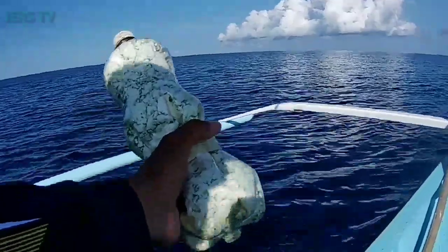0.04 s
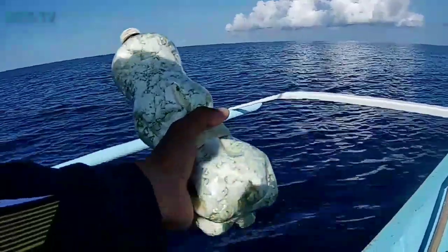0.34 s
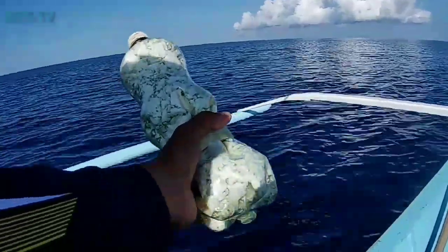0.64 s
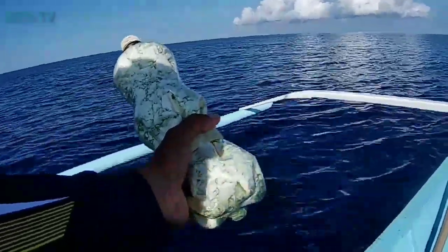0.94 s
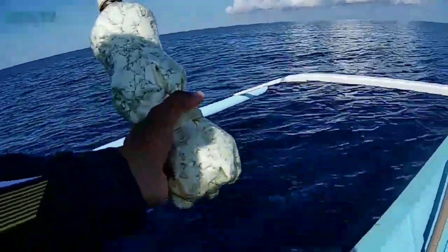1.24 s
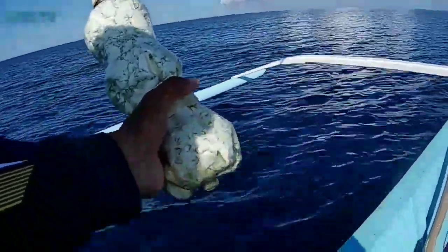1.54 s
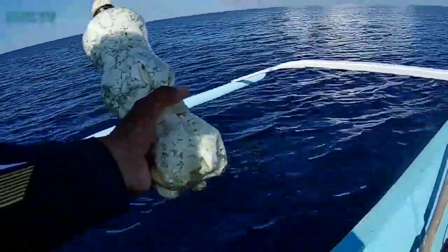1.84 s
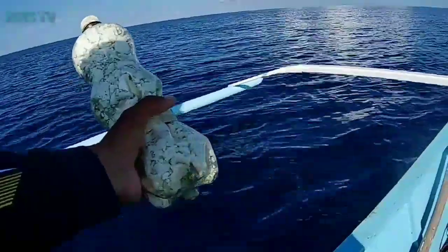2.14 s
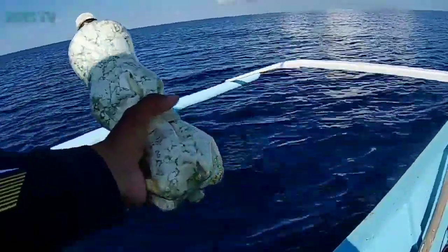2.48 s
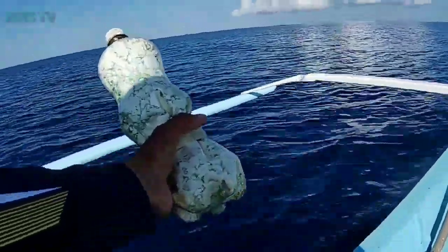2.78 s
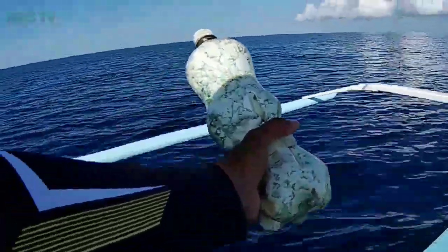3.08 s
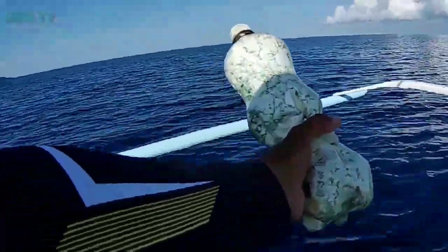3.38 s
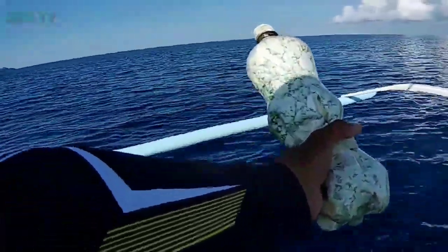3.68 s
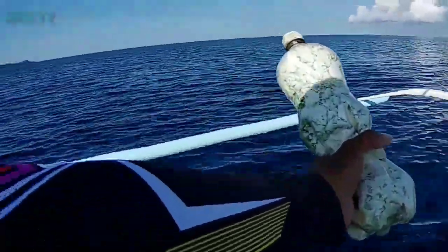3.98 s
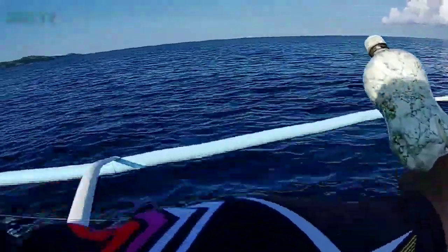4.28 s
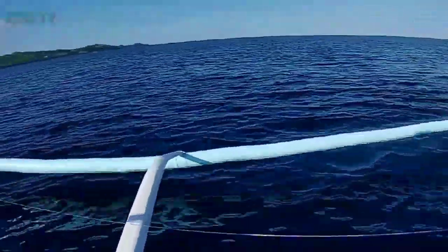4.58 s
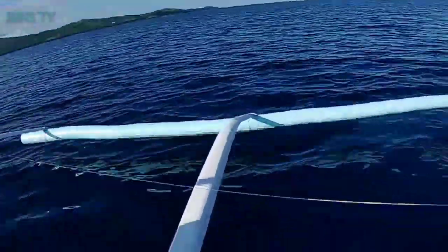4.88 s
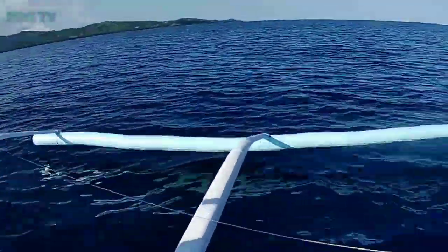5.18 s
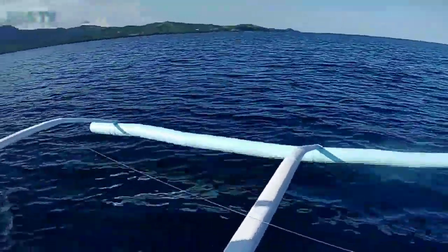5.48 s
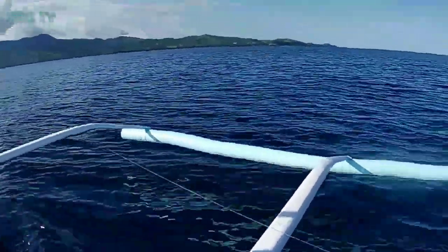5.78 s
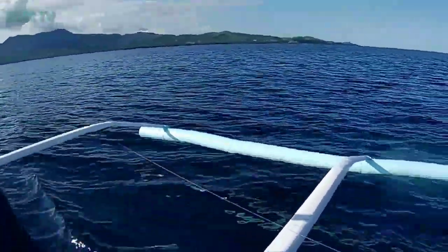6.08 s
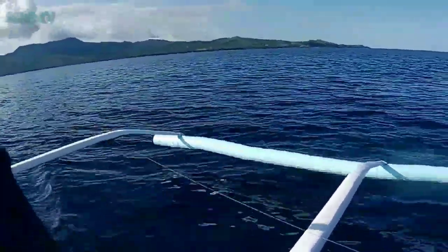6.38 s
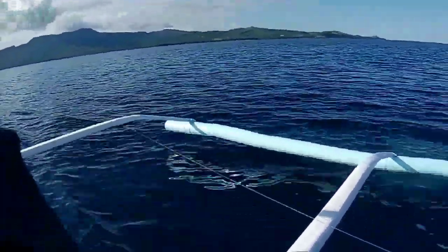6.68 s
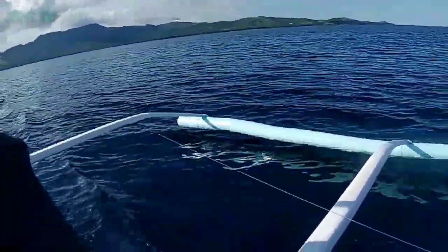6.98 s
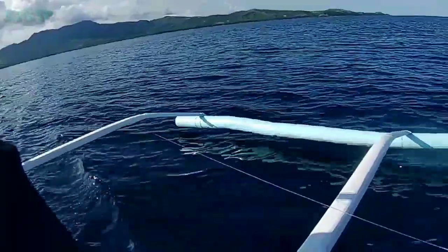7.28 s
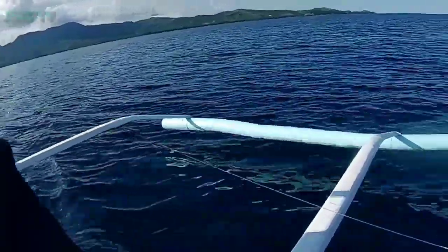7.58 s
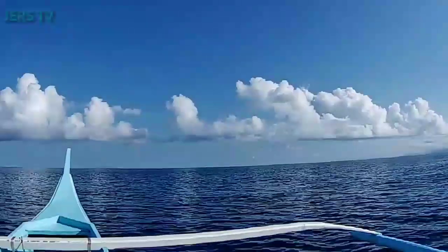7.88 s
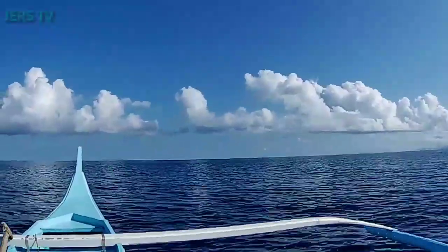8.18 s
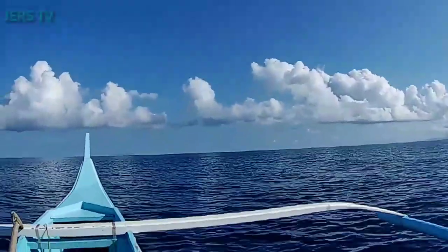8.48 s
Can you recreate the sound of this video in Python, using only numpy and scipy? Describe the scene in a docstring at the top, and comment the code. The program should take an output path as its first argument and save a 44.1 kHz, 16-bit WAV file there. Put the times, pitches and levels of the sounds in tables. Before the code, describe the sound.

Close on board, a single-cylinder boat engine chugs steadily and clatters, then with a click turns abruptly faster, louder and harsher.

```python
"""On board a small outrigger boat on a calm sea, the microphone close to a single-cylinder four-stroke. Each
firing booms out of the exhaust and shakes the hull while the valve gear clatters over a dull churn. The
listener turns to the side, which changes the engine's colour; fishing tackle ticks a few times. Then, with a
click, the scene changes to a faster, louder beat that overloads the microphone."""
import sys
import numpy as np
from scipy import signal
from scipy.fft import rfft, irfft, next_fast_len
from scipy.io import wavfile

SR = 44100
rng = np.random.default_rng(int(sys.argv[2]) if len(sys.argv) > 2 else 0)


def persist_wave(psi):
    """Save psi, clipped to +-1, as 16-bit WAV."""
    counts = np.round(np.clip(psi, -1, 1) * 32767).astype(np.int16)
    wavfile.write(sys.argv[1], SR, np.atleast_2d(counts).T)


N = 381024
LEAD = 11025   # samples: the engine is already running at time zero
TIME = np.arange(-LEAD, N) / SR
JUMP_S = 7.8893   # the fast beat takes over


def from_db(db):
    """Decibels to gain."""
    return 10 ** (np.asarray(db) / 20)


def rms_one(x):
    """Scale to unit rms."""
    return x / np.sqrt(np.mean(x ** 2) + 1e-20)


def in_time(rows):
    """Join (time, value) rows by straight lines."""
    return np.interp(TIME, *np.transpose(rows))


def white():
    """White noise for the whole scene."""
    return rng.standard_normal(len(TIME))


def wander(per_s):
    """Slow chance: random values joined by straight lines, spread about 1."""
    values = rng.standard_normal(256)
    return np.interp((TIME - TIME[0]) * per_s, np.arange(len(values)), values)


def coloured(x, spectrum):
    """Filter a signal by a (Hz, dB) curve; rms 1."""
    size = next_fast_len(len(x))
    hz, db = np.transpose(spectrum)
    bins = np.maximum(np.arange(size // 2 + 1) * SR / size, 1)
    gain = from_db(np.interp(np.log(bins), np.log(hz), db))
    return rms_one(irfft(rfft(x, size) * gain, size)[:len(x)])


def resonance(x, hz, width_hz):
    """Two-pole resonance with gain 1 on top."""
    r = np.exp(-np.pi * width_hz / SR)
    feedback = [1, -2 * r * np.cos(2 * np.pi * hz / SR), r * r]
    return signal.lfilter(np.array([1, 0, -1]) * (1 - r * r) / 2, feedback, x + 1e-18)


def panel(kicks, hz, width_hz):
    """A panel swells and fades after each kick."""
    return resonance(resonance(kicks, hz, width_hz), hz, width_hz)


def cycles(rpm, firing_s):
    """Count of engine cycles, one per two turns, whole at each firing."""
    count = np.cumsum(rpm * np.ones(len(TIME))) / (120 * SR)
    return count - np.interp(firing_s, TIME, count)


def firings(cycle, uneven_db, jitter_s, lag_s=0):
    """One pressure kick per cycle, each a little different in strength and timing."""
    at = np.flatnonzero(np.diff(np.floor(cycle)))
    timing, strength = rng.standard_normal((len(at), 2)).T
    at += np.round((lag_s + jitter_s * timing) * SR).astype(int)
    kicks = np.zeros(len(TIME))
    kicks[np.clip(at, 0, len(TIME) - 1)] = from_db(uneven_db * strength) * SR / 1000
    return kicks


def burst(cycle, share, decay, uneven_db):
    """Envelope of a knock that comes once a cycle and dies away, with a new strength each time."""
    count, since = np.divmod(cycle - share, 1)
    strength = from_db(uneven_db * rng.standard_normal(256))
    return strength[(count - count.min()).astype(int)] * np.exp(-since / decay)


# colour of the churn: (frequency [Hz], relative level [dB])
CHURN_SPECTRUM = [(15, -11), (40, -12.5), (65, -6.5), (100, -1.5), (135, 7.5), (200, -1), (300, -5.5),
                  (430, -10), (530, -13.5), (700, -15.5), (1100, -64.5)]

def churn(level_db):
    """Engine and water churn dully behind everything else."""
    return from_db(level_db) * coloured(white(), CHURN_SPECTRUM)


# ticks of the tackle: (time [s], relative level [dB])
TACKLE_TICKS = [(5.1128, -25), (5.1847, -12), (5.2108, -17.5), (5.254, -26), (5.2854, -21.5),
                (6.528, -24.5)]

def contacts(count, bounce_s=0.01, loss_db=13):
    """Each tick and its uneven bounces, weaker every time: (time [s], level [dB])."""
    gaps = bounce_s * rng.uniform(.8, 1.2, (len(TACKLE_TICKS), count))
    return [(s + gap[:k].sum(), db - k * loss_db)
            for (s, db), gap in zip(TACKLE_TICKS, gaps) for k in range(count)]


# modes of the tackle: (frequency [Hz], width [Hz], relative level [dB])
TACKLE_MODES = [(854, 99, 23.5), (1390, 300, 14), (1970, 320, 15), (3590, 240, 15.5), (4550, 260, -1),
                (5800, 390, -1), (7000, 740, 3.5), (9750, 810, 2), (12000, 2000, -3)]

def tackle(decay_s, gain_db, scrape_db, dull_hz):
    """Each contact, a sharp blow with a brief scrape, rings the fishing tackle on board."""
    age = np.arange(SR // 100) / SR
    touch = np.zeros(len(TIME))
    for s, db in contacts(count=3):
        scrape = rng.standard_normal(len(age)) * np.exp(-age / decay_s)
        blow = (age == 0) + from_db(scrape_db) * scrape / np.linalg.norm(scrape)
        at = np.searchsorted(TIME, s)
        touch[at:at + len(age)] += from_db(db) * blow
    touch = signal.lfilter(*signal.butter(1, dull_hz, fs=SR), touch)   # the tackle is not quite hard
    return sum(from_db(gain_db + db) * resonance(touch, hz, width) for hz, width, db in TACKLE_MODES)


def click(gain_db, dull_hz):
    """One sharp click as the scene changes."""
    spike = np.zeros(len(TIME))
    spike[np.searchsorted(TIME, JUMP_S)] = from_db(gain_db)
    return signal.lfilter([1], [1, -np.exp(-2 * np.pi * dull_hz / SR)], spike)


def facing(turn, ahead_db, side_db):
    """Gain at the microphone as it turns from ahead (0) to the side (1)."""
    return from_db(ahead_db + turn * (side_db - ahead_db))


# modes of the valve: (frequency [Hz], width [Hz], relative level [dB])
VALVE_MODES = [(4170, 86, 4), (5030, 180, 4), (6150, 87, -5), (7700, 500, -8.5), (10080, 440, -12)]

def valve(cycle, turn):
    """The valve taps once a cycle, a short bright tick of uneven strength."""
    taps = white() * burst(cycle, share=0.028, decay=0.077, uneven_db=4.5)
    ring = sum((-1) ** k * from_db(db) * resonance(taps, hz, width)
               for k, (hz, width, db) in enumerate(VALVE_MODES))
    return facing(turn, ahead_db=-68, side_db=-55.5) * rms_one(ring)


# covers, slow: (frequency [Hz], width [Hz], struck at [cycles], level ahead [dB], level to the side [dB])
SLOW_COVER_MODES = [(991, 62, .24, -52.5, -40.5), (1289, 57, .25, -49, -33), (2034, 100, .225, -51, -50.5),
                    (2315, 23, .25, -54.5, -52.5), (3720, 320, 0.17, -68, -64),
                    (4205, 200, 0.16, -62.5, -65.5)]

def slow_covers(cycle, turn, chatter_db=-3.0):
    """Loose metal covers are struck once a cycle, never at quite the same instant, and chatter briefly."""
    sound = 0
    for hz, width, share, ahead, side in SLOW_COVER_MODES:
        strikes = firings(cycle - share, uneven_db=2.0, jitter_s=.0005)
        ping = rms_one(panel(strikes, hz, width))
        buzz = white() * burst(cycle, share, decay=0.098, uneven_db=4.0)
        # heavily damped covers chatter more than they ring
        chatter = from_db(chatter_db) * width / 100 * rms_one(resonance(buzz, hz, width))
        sound += facing(turn, ahead, side) * rms_one(ping + chatter)
    return sound


# covers, fast: (frequency [Hz], width [Hz], level [dB])
FAST_COVER_MODES = [(1201, 26, -37.5), (1860, 60, -42.5), (2030, 59, -46.5), (2270, 41, -43),
                    (3810, 67, -48), (4150, 120, -57)]

def fast_covers(cycle):
    """At high speed the clatter keeps the engine covers ringing."""
    knocks = clatter(cycle, FAST_GEAR_KNOCKS, steady_db=4, uneven_db=3.5)
    return sum(from_db(db) * rms_one(resonance(knocks, hz, width)) for hz, width, db in FAST_COVER_MODES)


def clatter(cycle, knocks, steady_db, uneven_db):
    """Valve and piston knocks are bursts of noise over the steady whirr of the gear."""
    power = sum((from_db(db) * burst(cycle, share, decay, uneven_db)) ** 2 for share, decay, db in knocks)
    return white() * np.sqrt(power + from_db(steady_db) ** 2)


# knocks, slow: (time after the exhaust opens [cycles], decay [cycles], relative level [dB])
SLOW_GEAR_KNOCKS = [(0.065, 0.12, -1.5), (0.269, 0.25, -0.5), (0.679, .07, -10), (.825, 0.12, 0)]
# clatter with the microphone facing ahead, and to the side: (frequency [Hz], relative level [dB])
AHEAD_SPECTRUM = [(440, -32.5), (700, 0.5), (1100, 0), (1470, -7.5), (1800, -23.5), (2050, -12),
                  (2380, -13), (3150, -23.5), (3700, -16.5), (4400, -18), (5700, -31), (8200, -38),
                  (10500, -49), (15500, -62)]
SIDE_SPECTRUM = [(440, -37.5), (750, -8), (950, -4.5), (1290, -3), (1500, -8.5), (2320, -13), (2980, -29.5),
                 (3750, -23), (5000, -24), (5700, -32.5), (7500, -29), (8800, -41.5), (10100, -41),
                 (15500, -66.5)]

def slow_gear(cycle, turn, wander_db=-2.77):
    """The gear's clatter wanders in strength and changes colour as the microphone turns."""
    knocks = clatter(cycle, SLOW_GEAR_KNOCKS, steady_db=-4.5, uneven_db=2.5)
    gain = facing(turn, ahead_db=-38, side_db=-36) * from_db(wander_db * wander(per_s=2.7))
    return gain * ((1 - turn) * coloured(knocks, AHEAD_SPECTRUM) + turn * coloured(knocks, SIDE_SPECTRUM))


# knocks, fast: (time [cycles], decay [cycles], relative level [dB])
FAST_GEAR_KNOCKS = [(.045, 0.32, 12.5), (0.169, 0.17, 11), (.29, 0.17, 12.5), (.62, .08, -9)]
# colour of the rasp: (frequency [Hz], relative level [dB])
RASP_SPECTRUM = [(400, -13), (700, 0), (1150, -1), (1550, -7), (1950, 0.5), (2400, -7.5), (3000, -17),
                 (3900, -9.5), (4700, -17), (5800, -25), (7500, -30.5), (11000, -54.5), (15500, -53.5)]

def rasp(cycle, start_db=-29, rise_db_per_s=3.5):
    """At high speed the knocks make a harsh rasp that grows louder."""
    knocks = clatter(cycle, FAST_GEAR_KNOCKS, steady_db=-4, uneven_db=2.0)
    return from_db(start_db + rise_db_per_s * (TIME - JUMP_S)) * coloured(knocks, RASP_SPECTRUM)


def frame(kicks, level_db, decay_s, spectrum):
    """The many small modes of the frame answer every kick with the same short rattle."""
    age = np.arange(SR // 10) / SR
    answer = rng.standard_normal(len(age)) * np.exp(-age / decay_s)
    return from_db(level_db) * coloured(signal.fftconvolve(kicks, answer)[:len(TIME)], spectrum)


# hull panels, slow: (frequency [Hz], width [Hz], delay [s], gain ahead [dB], gain to the side [dB])
SLOW_PANELS = [(73, 15.3, 0.01, 6.5, 9.5), (226.3, 37, 0.0039, 3, -2), (272.4, 30, 0.00887, -2, 2),
               (309, 36.4, 0.00598, 2.5, -10), (334, 15, 0.00536, -1, -19),
               (396.5, 29.2, 0.0148, 0.5, 13.5), (435.3, 30, 0.00785, -8, -3.5),
               (468.6, 14, 0.00803, -4.5, -3), (589.6, 9.4, 0.0043, -10.5, -8)]

def slow_hull(shakes, turn):
    """The hull panels around the microphone each answer a moment after the firing."""
    return sum((-1) ** k * facing(turn, ahead, side) * panel(np.roll(shakes, round(delay * SR)), hz, width)
               for k, (hz, width, delay, ahead, side) in enumerate(SLOW_PANELS))


# hull panels, fast: (frequency [Hz], width [Hz], gain [dB])
FAST_PANELS = [(94.1, 6, 24), (149.25, 5.5, 18), (169, 16, -14), (250, 19.5, 3.5), (357, 22.2, 14),
               (498, 27, -3.5), (563, 31, -2.5), (746, 44, -4), (880, 75, -14.5), (933, 37, -7.5),
               (1016, 7.6, 0)]

def fast_hull(shakes):
    """Quick firings keep the lowest hull panels droning."""
    return sum((-1) ** k * from_db(db) * panel(shakes, hz, width)
               for k, (hz, width, db) in enumerate(FAST_PANELS))


def exhaust(kicks, gain_db, band_hz):
    """The silencer turns each kick into a boom of about three swings."""
    silencer = signal.butter(3, band_hz, "band", fs=SR, output="sos")
    return -from_db(gain_db) * signal.sosfilt(silencer, kicks + 1e-18)


# slow running: (time [s], crank speed [rpm])
CRANK_SPEED = [(0.0, 1956.1), (0.47, 1903.2), (1.03, 1912.4), (1.32, 1936.6), (2.46, 1930.1),
               (2.61, 1953.1), (3.08, 1930.5), (4.14, 1946.4), (4.6, 1922.4), (5.09, 1952.7),
               (5.77, 1918.5), (6.33, 1959.3), (6.96, 1942.4), (7.88, 1961.6)]
# where the microphone faces: (time [s], turn [0 ahead .. 1 to the side])
MICROPHONE_TURN = [(0, 0.14), (1.4, 0.01), (2.7, 0.068), (3.3, 0.27), (4.1, 0.16), (4.8, 0.67)]

def slow_engine():
    """Sixteen firings a second; hull and covers change colour as the microphone turns."""
    cycle = cycles(in_time(CRANK_SPEED), firing_s=-.005)
    turn = in_time(MICROPHONE_TURN)
    puffs = firings(cycle, uneven_db=.4, jitter_s=.00007)
    boom = exhaust(puffs, gain_db=15.0, band_hz=(116.2, 182.3))
    shakes = firings(cycle, uneven_db=-0.5, jitter_s=.00006)
    covers = slow_covers(cycle, turn)
    rattle = frame(shakes, level_db=-36.5, decay_s=0.081, spectrum=[
        (350, -26), (520, -12), (650, 2), (850, -2.5), (1100, 5.5), (1400, -1), (2400, -13), (5000, -59)])
    gear = slow_gear(cycle, turn) + valve(cycle, turn)
    return boom + slow_hull(shakes, turn) + covers + rattle + gear + churn(level_db=-22.0)


def fast_engine():
    """At high speed the booms run into each other and each carries a harsh, ringing rasp."""
    cycle = cycles(rpm=2932, firing_s=7.9002)
    puffs = firings(cycle, uneven_db=-0.5, jitter_s=.00008)
    boom = exhaust(puffs, gain_db=14.5, band_hz=(104.5, 190.3))
    shakes = firings(cycle, uneven_db=0.3, jitter_s=.00007, lag_s=0.002)
    rattle = frame(shakes, level_db=-29.5, decay_s=0.038, spectrum=[
        (350, -22), (520, 9), (900, 4), (1300, 3), (2200, -18), (3000, -30), (6000, -51)])
    return boom + fast_hull(shakes) + rattle + fast_covers(cycle) + rasp(cycle) + churn(level_db=-16.5)


def scene():
    """From on board, in mono: the slow beat gives way at once to the fast one."""
    engine = np.where(TIME < JUMP_S, slow_engine(), fast_engine())
    ticks = tackle(decay_s=0.002, gain_db=12.5, scrape_db=-5, dull_hz=5160)
    return (engine + ticks + click(gain_db=14.5, dull_hz=2200))[None, LEAD:]


def record(dry):
    """The microphone overloads, flattening the strongest swings; the top is cut at 15.8 kHz."""
    rounded = dry / (1 + dry ** 12) ** (1 / 12)
    return signal.sosfilt(signal.ellip(10, .1, 80, 15800, fs=SR, output="sos"), rounded)


dry = scene()
out = record(dry)
persist_wave(out)
```